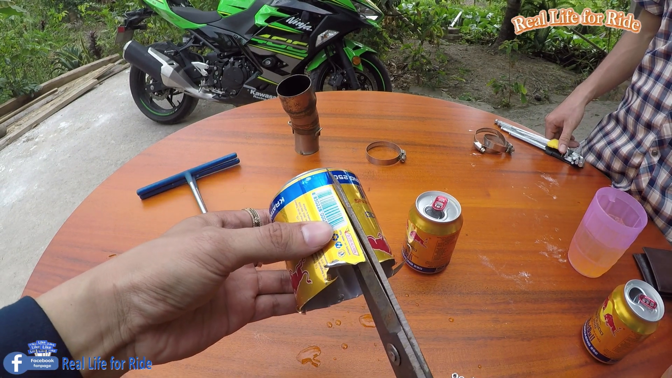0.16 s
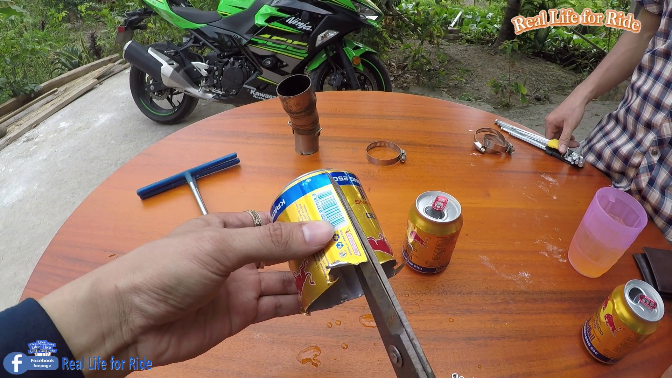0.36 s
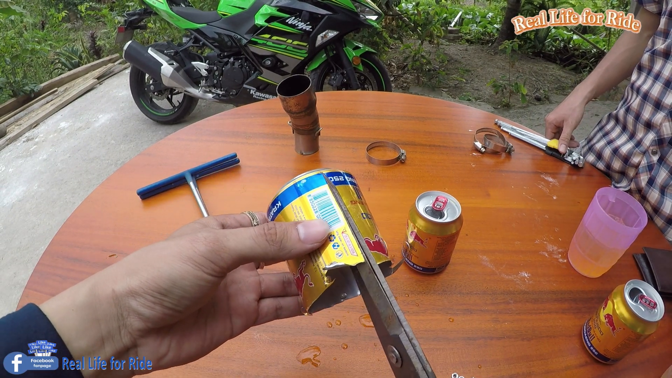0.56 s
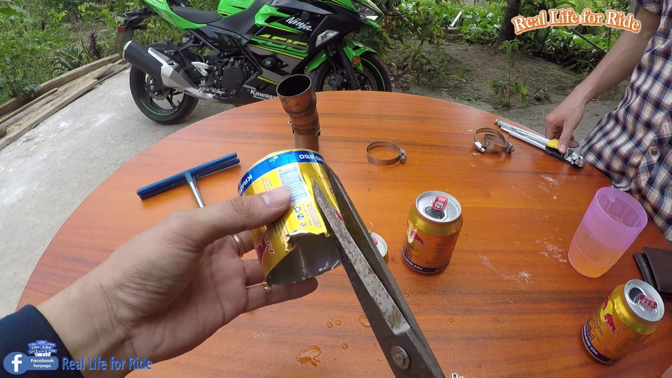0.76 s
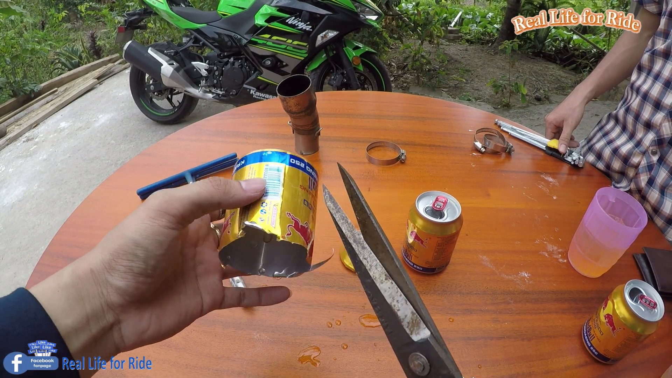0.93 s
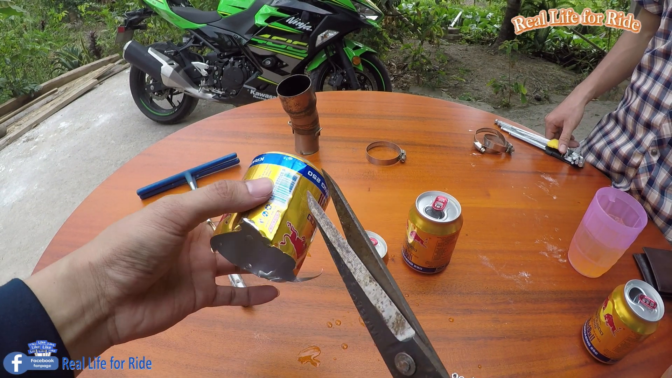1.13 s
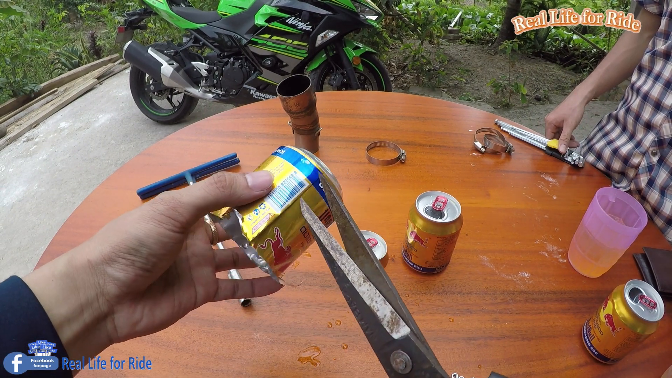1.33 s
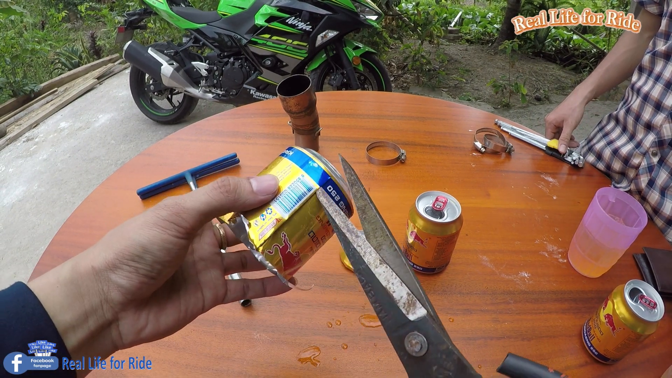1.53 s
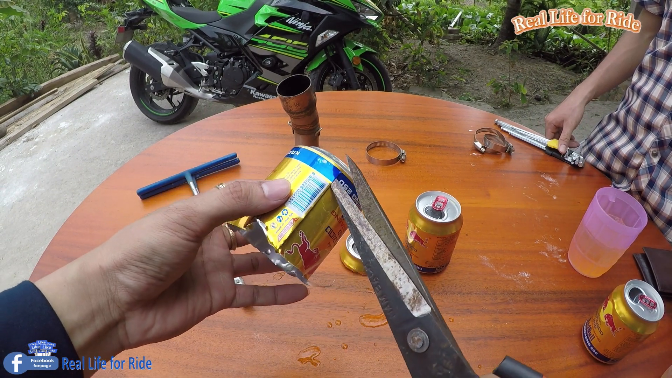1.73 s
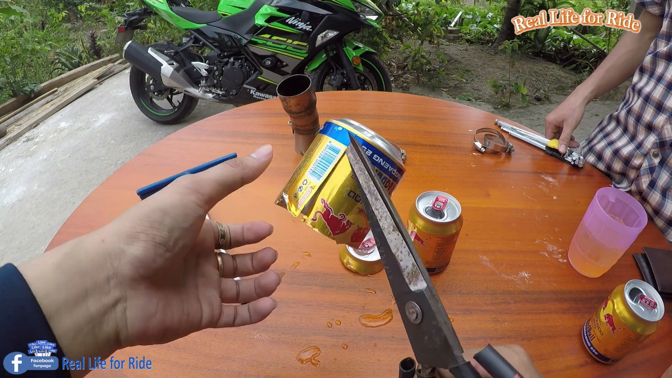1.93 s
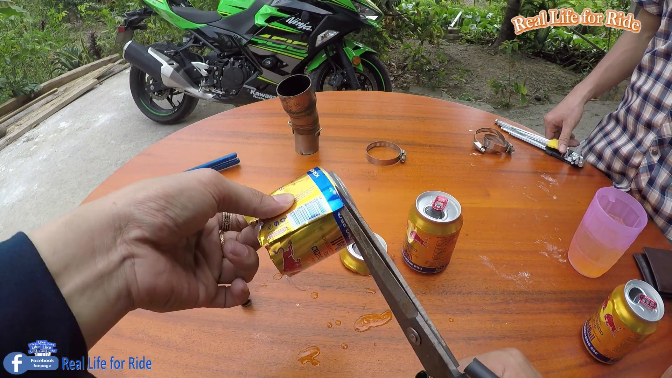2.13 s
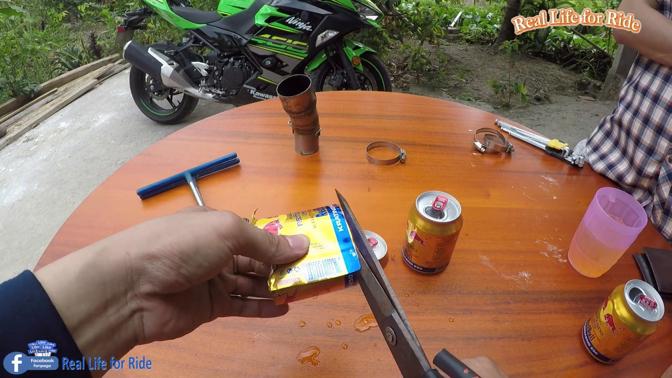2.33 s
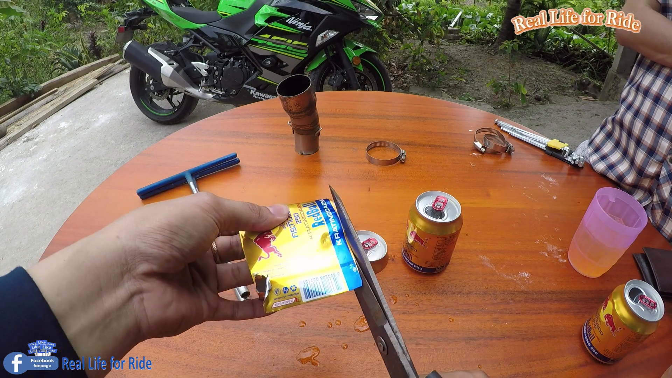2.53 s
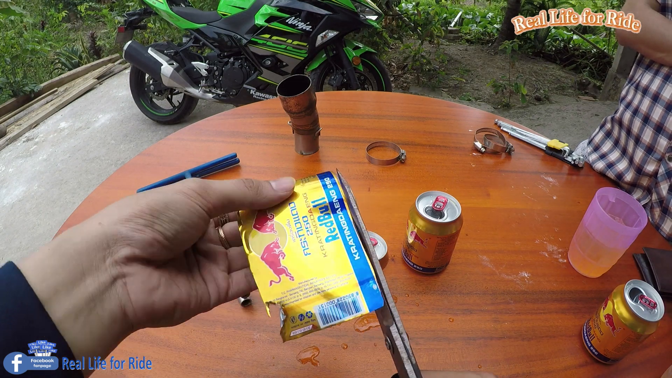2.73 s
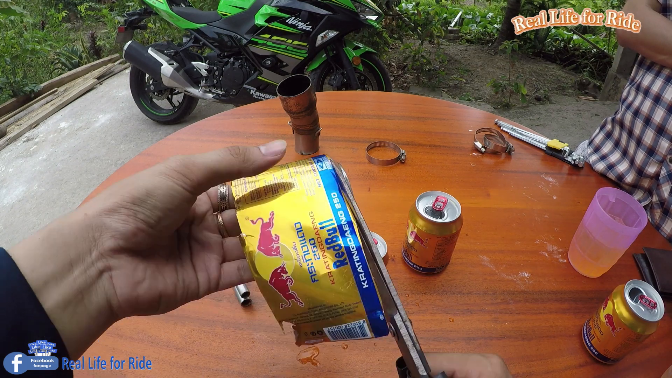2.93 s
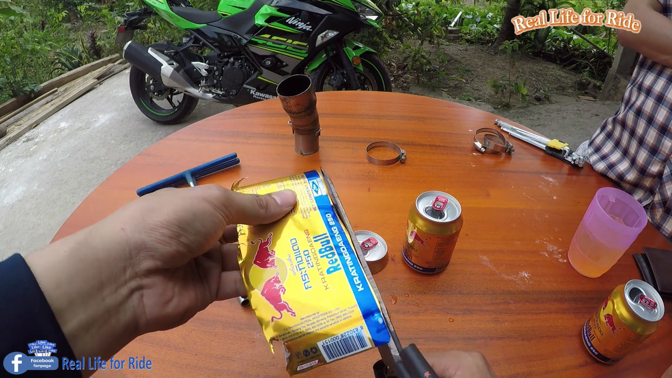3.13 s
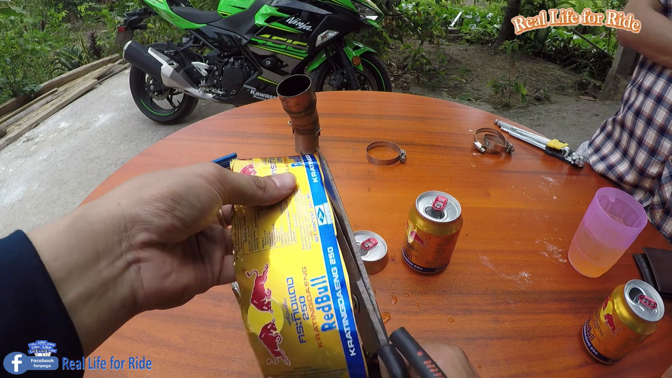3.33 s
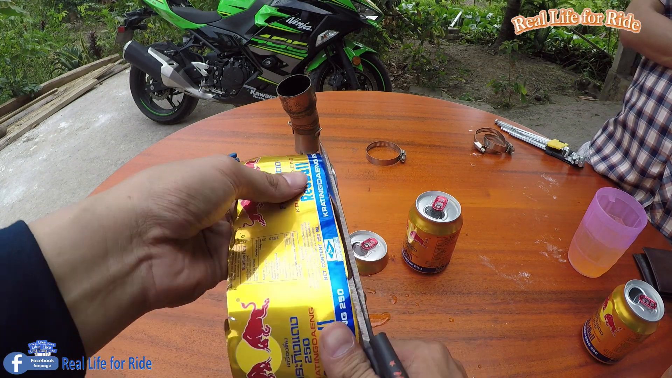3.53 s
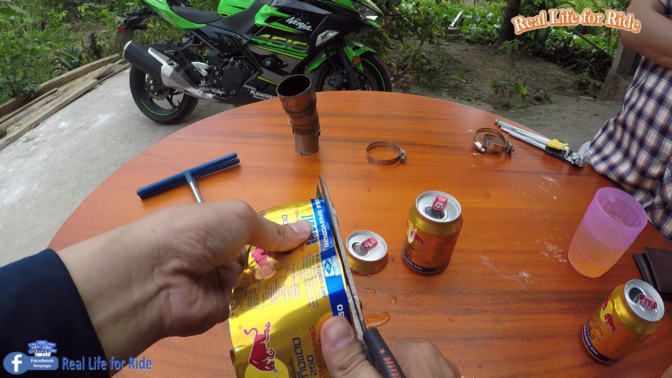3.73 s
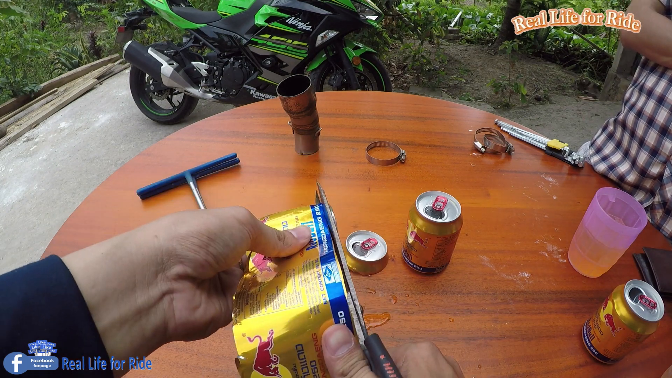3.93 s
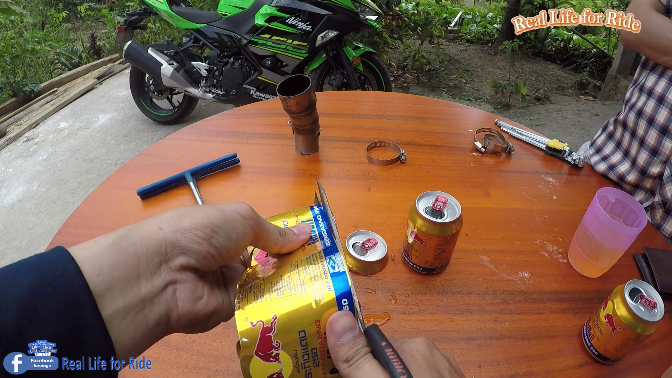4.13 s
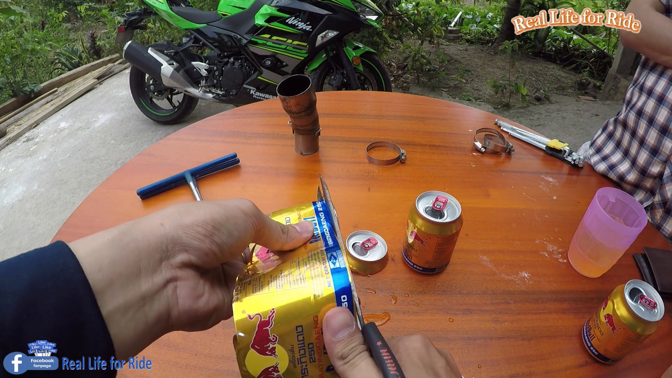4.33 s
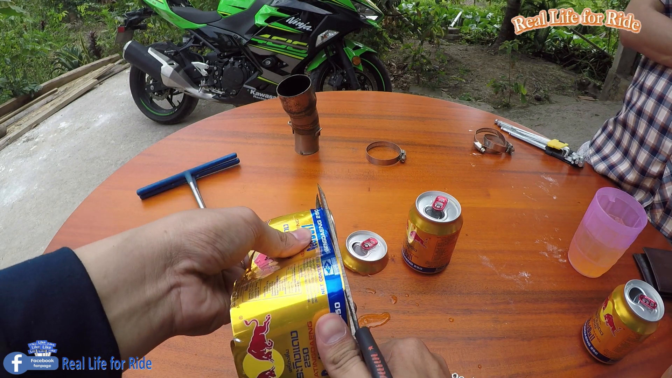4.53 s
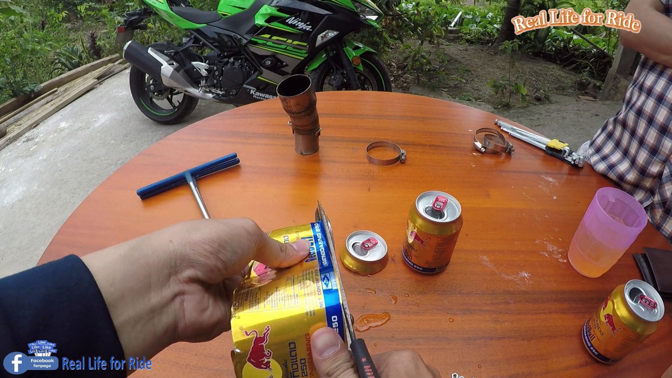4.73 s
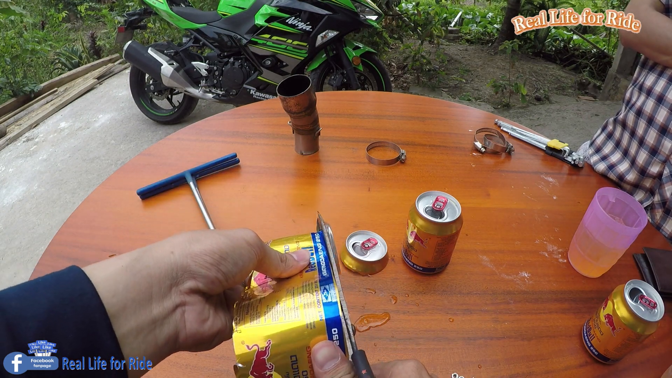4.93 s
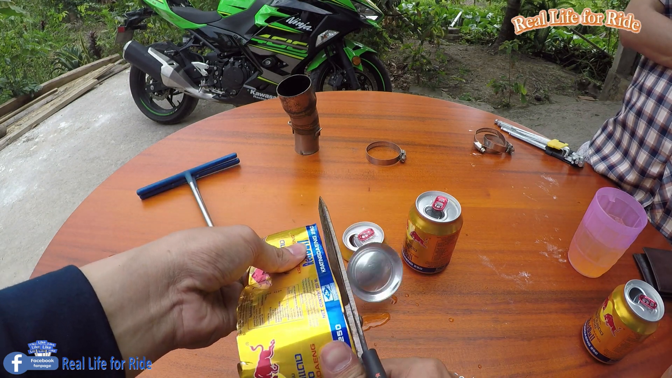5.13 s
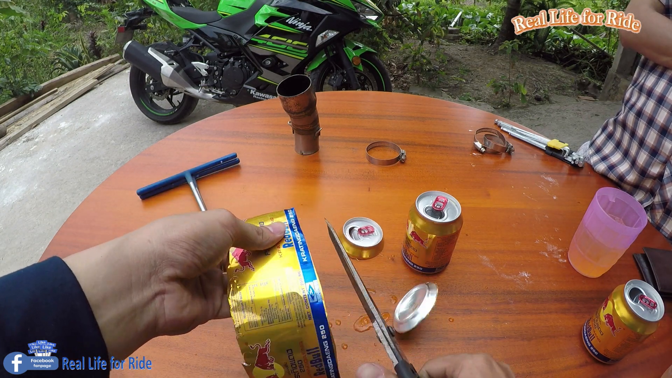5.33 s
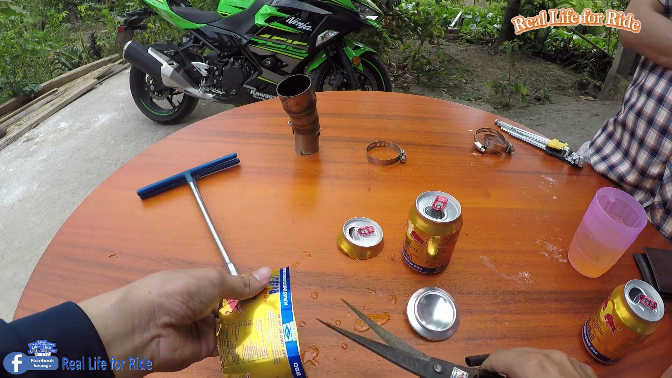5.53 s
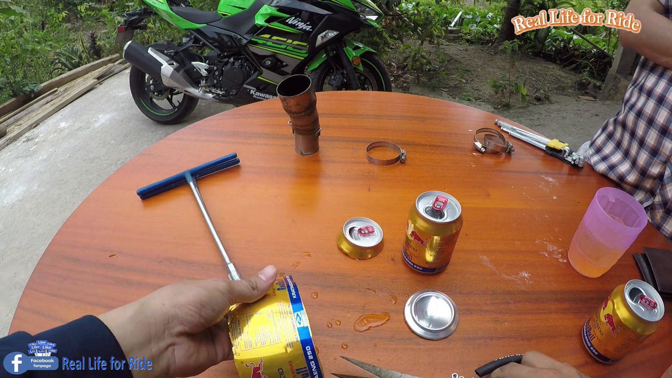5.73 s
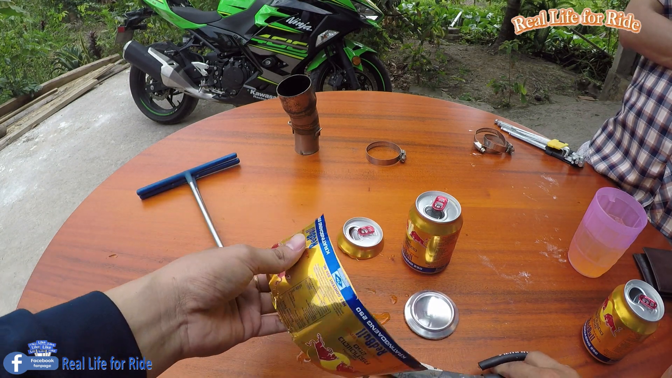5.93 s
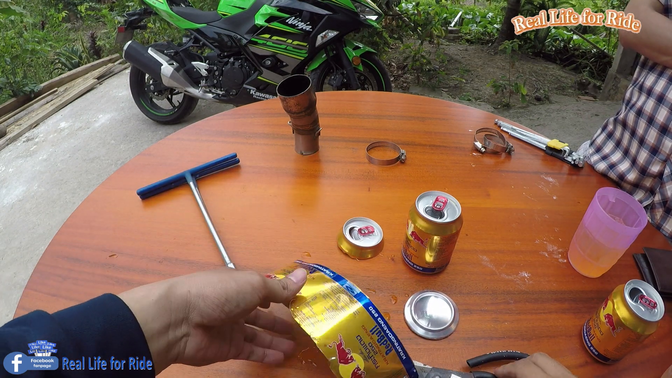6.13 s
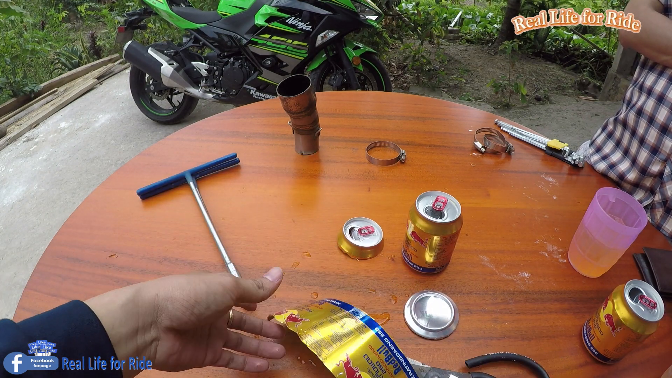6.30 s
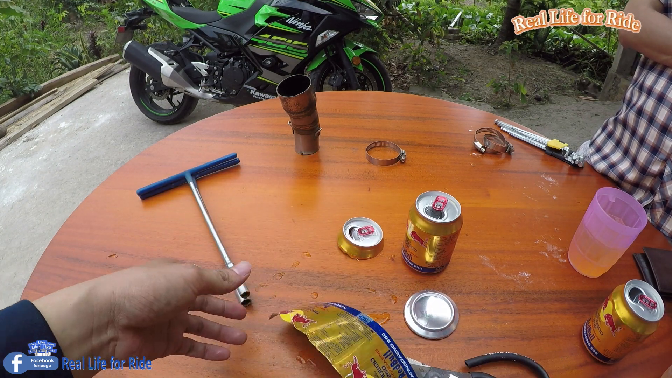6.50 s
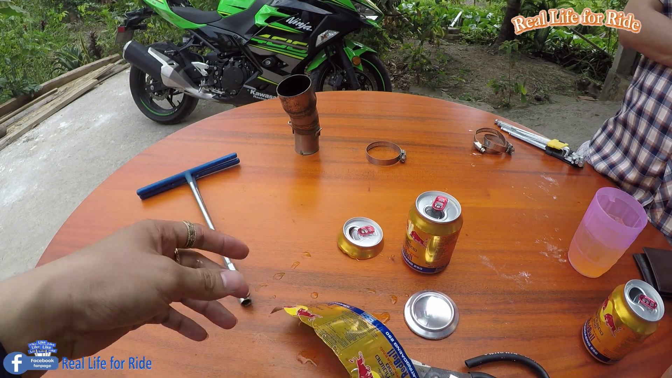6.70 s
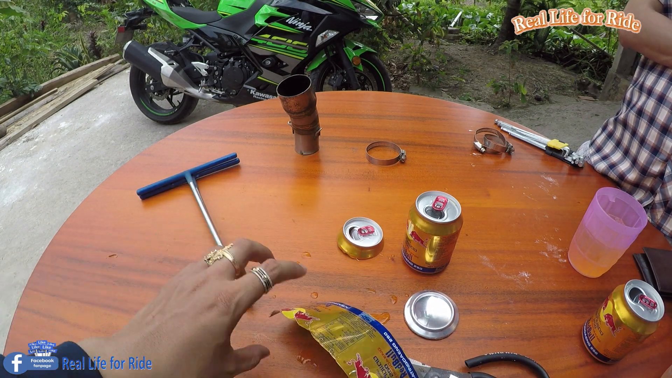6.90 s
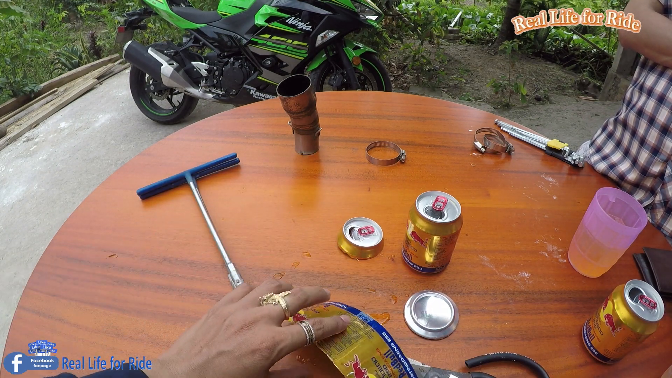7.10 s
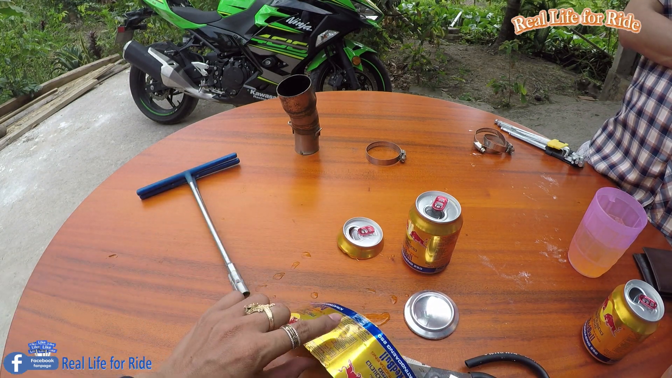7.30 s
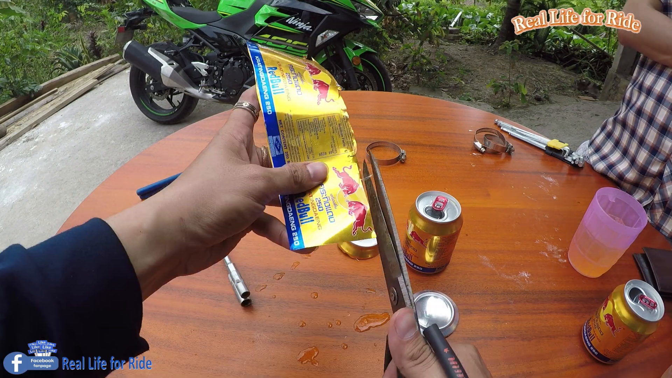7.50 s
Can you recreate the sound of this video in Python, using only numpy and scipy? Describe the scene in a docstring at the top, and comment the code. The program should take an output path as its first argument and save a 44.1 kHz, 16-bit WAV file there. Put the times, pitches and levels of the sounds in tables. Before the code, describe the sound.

Sharp metallic snips in a hollow can, a stretch of tiny high fast-forward ticks, loud sheet snaps, a rattling metal disc, wooden thumps.

```python
"""At a wooden garden table, close to the microphones, big scissors cut up an aluminium can.
Snips and strokes are fracture noise that excites the can's hollow and the modes of its wall.
For a while all runs thin and high, as in fast-forward: tiny ticks, crackle, zips and a thin hiss.
The can's base, cut free, clatters as struck modes on the table, and the scissors are put down;
the loose sheet scrapes in stick-slip and is cut again, over a drone, faint air and a breeze."""
import sys
import numpy as np
from scipy import signal
from scipy.fft import rfft, irfft
from scipy.io import wavfile
from scipy.ndimage import uniform_filter1d, map_coordinates

SR = 44100
rng = np.random.default_rng(int(sys.argv[2]) if len(sys.argv) > 2 else 0)


def wav_record(signal):
    """Record a signal, one row per channel, as 16-bit PCM in the file named by sys.argv[1]."""
    frames = np.transpose(np.atleast_2d(signal))
    bounded = np.clip(frames, -1, 1)
    # unit amplitude maps onto the largest positive 16-bit level
    quanta = np.round(bounded * 32767).astype(np.int16)
    wavfile.write(sys.argv[1], SR, quanta)


N = 333396
TIME = np.arange(N) / SR  # the whole scene (s)
TAIL = np.arange(SR) / SR  # one second of decay (s)


def amp(db):
    """Level law: decibels to amplitude gain."""
    return 10 ** (np.asarray(db) / 20)


def unit(x):
    """Power normalisation: x at rms 1."""
    return x / np.sqrt(np.mean(x ** 2) + 1e-20)


def along(points, hz):
    """Logarithmic frequency scale: (Hz, value) points interpolated on it."""
    point_hz, values = np.transpose(points)
    return np.interp(np.log(hz + 1), np.log(point_hz), values)


def gains(rows):
    """Amplitude envelope: a gain per sample for each dB column, silent outside the rows."""
    times, *columns = np.transpose(rows)
    inside = (TIME >= times[0]) * (TIME <= times[-1])
    return np.array([amp(np.interp(TIME, times, column)) * inside for column in columns])


def add(track, at, sound):
    """Superposition: mix a sound into the track at a time in seconds."""
    part = track[..., max(round(at * SR), 0):][..., :sound.shape[-1]]
    part += sound[..., :part.shape[-1]]


def through(x, response):
    """Linear response: convolve both channels with an impulse response."""
    return signal.fftconvolve(x, np.atleast_2d(response), axes=1)[:, :N]


def colour(x, spectrum, ripple_db=0, size=4096):
    """Minimum-phase filtering that keeps white noise's power; ripple stands for crowded modes."""
    hz = np.fft.rfftfreq(size, 1 / SR)
    skirt = hz ** 2 / (hz ** 2 + (spectrum[0][0] / 2) ** 2)  # rolls off below the first point
    ripple = ripple_db * map_coordinates(rng.standard_normal(size), [hz / 190])
    cepstrum = irfft(np.log(amp(along(spectrum, hz) + ripple) * skirt + 1e-6))
    # folding the cepstrum makes the response causal
    response = irfft(np.exp(rfft(2 * cepstrum[:size // 2], size)))
    return through(x, response / np.linalg.norm(response))


def hiss(alike, size=N):
    """Interchannel coherence: white stereo noise; likeness is a number or (Hz, likeness) points."""
    likeness = along(alike, np.fft.rfftfreq(size, 1 / SR)) if np.ndim(alike) else alike
    turn = np.arccos(np.clip(likeness, -1, 1)) / 2
    a, b = rfft(rng.standard_normal((2, size)))
    mid = irfft(a * np.cos(turn), size)
    side = irfft(b * np.sin(turn), size)
    return np.array([mid + side, mid - side])


# Stereo coherence of the metal. Each row: frequency in Hz, left-right likeness from -1 to 1.
METAL_ALIKE = [(400, .1), (1000, 0.78), (3500, 0.98), (10000, 0.57)]


def bursts(times, levels_db, spectrum, t60, lead_db=-24, alike=METAL_ALIKE, ripple_db=2.0,
           detune=.015, size=4096):
    """Sudden fracture: a short creak leads in, and each crack excites its own mix of modes."""
    out = np.zeros((2, N))
    lead, swell_rate = .01, 3500  # s, dB per s
    t = TAIL[:size] - lead
    shape = amp(np.where(t < 0, lead_db + swell_rate * t, -60 * t / t60))
    for at, db in zip(times, levels_db):
        pitch = np.exp(detune * rng.standard_normal())
        shifted = np.multiply(spectrum, [pitch, 1])
        crack = colour(hiss(alike, size) * shape, shifted, ripple_db)
        add(out, at - lead, amp(db) * crack * np.linalg.norm(shape) / np.linalg.norm(crack))
    return out


def grains(rate, spread_db, t60):
    """Stick-slip friction: an envelope (rms 1) of tiny tears at random, about rate per second."""
    sizes = amp(spread_db * np.minimum(rng.exponential(size=N), 3))
    tears = sizes * (rng.random(N) < rate / SR)
    energy = signal.lfilter([1], [1, -amp(-60 / (t60 * SR)) ** 2], tears ** 2)
    return unit(np.sqrt(energy))


def ring(modes, apart):
    """Modal decay: damped sines, each with a random phase gap between channels (apart, in rad)."""
    hz, db, t60 = np.transpose(modes)[:, :, None]
    strength, shift = rng.standard_normal((2, len(modes), 1))
    rise = 1 - np.exp(-TAIL / .0004)
    fade = rise * amp(db + strength - 60 * TAIL / t60)
    phase = 2 * np.pi * hz * TAIL
    return np.array([(fade * np.sin(phase + side * apart * shift)).sum(0) for side in (-.5, .5)])


def swell(middle, width, order=2):
    """Gaussian envelope: rises and falls around the middle (s); a higher order flattens its top."""
    return np.exp(-.5 * ((TIME - middle) / width) ** order)


def held(start, attack_s, end, release_s):
    """Piecewise-linear envelope: rises from 0 at start, holds 1 until end, then falls back to 0."""
    return np.clip(np.minimum((TIME - start) / attack_s, 1 - (TIME - end) / release_s), 0, 1)


def scatter(start, end, db, count):
    """Random point process: rows (s, dB) of loosely spaced events, their levels varying around db."""
    times = start + (end - start) * (np.arange(count) + 2 * rng.random(count)) / (count + 1)
    return list(zip(times, db + 3 * rng.standard_normal(count)))


# Snips in the closed can. Each row: time in seconds, relative level in dB.
CLOSED_SNIPS = [(0.032, -17.5), (0.105, -18), (0.161, -10.5), (0.182, -15.5), (0.387, -1.5), (0.724, -10),
                (1.189, -23), (1.307, -17.5), (1.559, -13), (1.655, -15.5), (1.832, -13)]
# Blade strokes through the wall. Each row: middle in seconds, relative level in dB,
# half width in seconds, hollow band relative to the edge in dB.
WALL_STROKES = [(0.658, -40, 0.045, 4), (0.727, -25.5, 0.016, -3.5), (0.78, -16.5, 0.027, -16),
                (1.369, -41.5, 0.039, 1), (1.431, -31.5, 0.017, 3.5), (1.47, -37.5, 0.031, 0),
                (1.565, -34.5, 0.019, 3)]
# Modes of the can's wall. Each row: frequency in Hz, relative level in dB, t60 in seconds.
WALL_MODES = [(895, 1, 0.23), (1058, 1.5, 0.33), (3405, -7.5, 0.087), (4670, -10, 0.21), (5700, -12, 0.33),
              (6950, -9.5, 0.25)]
# Modes of the loosened body. Each row: frequency in Hz, relative level in dB.
BODY_MODES = [(404, -1), (603, -2.5), (1040, 1), (1370, -3.5)]
# Spectrum of the cut edge. Each row: frequency in Hz, relative density in dB per Hz.
CAN_EDGE_COLOUR = [(1200, -21), (2000, -7.5), (2900, -10.5), (3400, 3.5), (3900, -4), (5900, 2.5),
                   (8000, -15), (16000, -35.5)]
# Spectrum of the hollow, also for the opened sheet. Each row: frequency in Hz, density in dB per Hz.
HOLLOW_COLOUR = [(350, -13), (720, -3), (1020, 4.5), (1900, -13.5), (3000, -48)]
HOLLOW_DB, HOLLOW_GROWS = -7, 0.83  # answer to a 0 dB snip (dB) and its growth (dB per dB)
CREAK_FROM, CREAK_TO, CREAK_DB = 0.16, 0.4, -37  # wall ticks under pressure (s, s, relative dB)
GROAN_FROM, GROAN_DB, GROAN_T60 = 1.4, -2, 0.068  # body groan (s, dB relative to the hollow, s)
WALL_FREED = 0.805  # the long stroke runs out of the wall (s)


def closed_can():
    """Fracture and resonance: blades snip and tear; the can's hollow and wall answer."""
    times, db = np.transpose(list(CLOSED_SNIPS) + scatter(CREAK_FROM, CREAK_TO, CREAK_DB, count=4))
    cut = bursts(times, db - 5.5, CAN_EDGE_COLOUR, t60=0.027, lead_db=-11.5)
    hollow_db = HOLLOW_DB + HOLLOW_GROWS * db
    cut += bursts(times, hollow_db, HOLLOW_COLOUR, t60=0.036, lead_db=-11.5)
    tear = grains(rate=1600, spread_db=3.5, t60=.01)
    edge = sum(amp(db) * swell(at, width, order=4) for at, db, width, _ in WALL_STROKES)
    hollow = sum(amp(db + rel) * swell(at, width) for at, db, width, rel in WALL_STROKES)
    for force, spectrum in (edge, CAN_EDGE_COLOUR), (hollow, HOLLOW_COLOUR):
        cut += colour(hiss(METAL_ALIKE) * tear * force, spectrum, ripple_db=3)
    out = cut + amp(-64.0) * through(cut, ring(WALL_MODES, apart=1.3))
    # cut far enough, the loosened body groans under the late strokes
    body = ring([(hz, level, GROAN_T60) for hz, level in BODY_MODES], apart=1)
    late_tear = hiss(0.77) * tear * hollow * (TIME > GROAN_FROM)
    out += amp(GROAN_DB) * through(late_tear, body / np.linalg.norm(body[0]))
    # released by the blades, the wall springs back and rings freely
    add(out, WALL_FREED, amp(-30.0) * ring(WALL_MODES, apart=0.94))
    return out


# Snaps in the sheet. Each row: time in seconds, relative level in dB, relative hollow band in dB.
SNAPS = [(4.0416, -17, -4), (4.5701, -22, -21), (4.6432, -4.5, -27.5), (4.7189, -21, -26.5),
         (4.998, 0, -24), (5.3764, -7.5, -20), (7.1736, -12.5, -17), (7.2192, -28, -9), (7.471, -19, -19.5),
         (7.5002, -9, -30)]
# Slides of thin metal. Each row: start in seconds, relative level in dB.
SLIDES = [(4.026, -39.5), (4.22, -48), (4.495, -42), (5.18, -25), (6.03, -27), (6.135, -27.5),
          (6.238, -21.5), (6.37, -35.5), (6.708, -47.5), (7.157, -28.5), (7.23, -38.5), (7.468, -29)]
# Spectrum of the sheet's edge. Each row: frequency in Hz, relative density in dB per Hz.
SHEET_COLOUR = [(710, -38.5), (1400, 2), (6200, 0.5), (7800, -12), (14200, -28), (16000, -43.5)]
# The sheet's clearest modes. Each entry: frequency in Hz.
SHEET_MODES_HZ = [1610, 3020, 4240, 5960]
SHEET_TONES_DB, SHEET_TONES_T60 = -24, 0.12  # relative to the snap's row (dB), decay (s)
SHEET_RING_DB = -25  # rough after-ring, relative to the snap's row (dB)
SLIDE_RISE_S, SLIDE_T60 = 0.0078, 0.31  # every slide swells and dies away alike (s)


def opened_sheet():
    """Plate modes and friction: the unrolled wall snaps, rings on roughly and scrapes as it slides."""
    times, db, hollow_db = np.transpose(SNAPS)
    out = bursts(times, db - 4.0, SHEET_COLOUR, t60=0.03)
    out += bursts(times, db + hollow_db + 4.5, HOLLOW_COLOUR, t60=0.058)
    out += bursts(times, db + SHEET_RING_DB, SHEET_COLOUR, t60=0.18, ripple_db=3, size=8192)
    modes = [(hz, 0, SHEET_TONES_T60) for hz in SHEET_MODES_HZ]
    for at, level, _ in SNAPS:
        add(out, at, amp(level + SHEET_TONES_DB) * ring(modes, apart=1))
    crinkle = grains(rate=1400, spread_db=3.6, t60=0.0066)
    crinkle_seconds = crinkle[:N // SR * SR].reshape(-1, SR)
    swelling = 1 - np.exp(-TAIL / SLIDE_RISE_S)
    for at, level in SLIDES:
        envelope = swelling * amp(level - 60 * TAIL / SLIDE_T60)
        scrape = hiss(METAL_ALIKE, SR) * rng.choice(crinkle_seconds) * envelope
        # every slide bends the sheet anew, and so has its own resonances
        bright = colour(scrape, SHEET_COLOUR, ripple_db=2)
        add(out, at, bright + amp(-12.5) * colour(scrape, HOLLOW_COLOUR))
    return out


# Modes of the blades. Each row: frequency in Hz, relative level in dB, t60 in seconds.
STEEL_MODES = [(3380, -10, 0.083), (5490, 4, 0.059)]
SCRAPE_FROM, SCRAPE_TO, SCRAPE_DB = 1.769, 1.835, -32  # scrape along the edge (s, s, relative dB)
SCRAPE_FROM_HZ, SCRAPE_TO_HZ = 2600, 5100  # pitch climbs towards this as the free edge shortens
BLADES_SHUT = 1.886  # s


def blades():
    """Stick-slip and impact: gritty slips grow louder and brighter; then the blades meet and ping."""
    out = np.zeros((2, N))
    for done in np.linspace(0, 1, num=7, endpoint=False):
        at = SCRAPE_FROM + done * (SCRAPE_TO - SCRAPE_FROM)
        hz = SCRAPE_FROM_HZ + done * (SCRAPE_TO_HZ - SCRAPE_FROM_HZ)
        decay = amp(SCRAPE_DB - 60 * TAIL[:4096] / 0.062)
        slip = (.5 + done) * hiss(0.53, size=4096) * decay
        add(out, at, colour(slip, [(900, -7), (hz, 0), (6500, -6), (9000, -25)], ripple_db=5))
    add(out, BLADES_SHUT, amp(-17.0) * ring(STEEL_MODES, apart=0.6))
    return out


# The rim hits the table. Each row: time in seconds, relative level in dB.
RIM_CONTACTS = [(5.0755, -7.5), (5.103, -1.5), (5.1871, -6), (5.2173, -11), (5.245, -8), (5.4374, -4.5),
                (5.4489, -1.5), (5.457, -13), (5.572, -5), (5.585, -3), (5.595, -9), (5.615, -12),
                (5.661, -14), (5.679, -4.5), (5.694, -7.5), (5.708, -8.5), (5.725, -7), (5.7945, -11),
                (5.888, -21)]
# Modes of the base. Each row: frequency in Hz, relative level in dB, t60 in seconds.
DOME_MODES = [(3080, -5, 0.24), (3640, -3, 0.15), (4390, -7.5, 0.45), (6260, 1, 0.28)]
# Modes of the base lying flat. Each row: frequency in Hz, relative level in dB, t60 in seconds.
FLAT_MODES = [(4455, -0.5, 0.57), (5900, -2, 0.37)]
# Spectrum of the rim's clicks. Each row: frequency in Hz, relative density in dB per Hz.
RIM_COLOUR = [(1200, -21.5), (2800, -4.5), (3700, 1), (6400, -13), (7500, -19), (15500, -39.5)]
# Stereo coherence of those clicks. Each row: frequency in Hz, left-right likeness from -1 to 1.
CLICK_ALIKE = [(1500, 0.33), (3500, 1), (8000, -0.32)]
# Spectrum driving the crowded modes. Each row: frequency in Hz, relative density in dB per Hz.
SHIMMER_COLOUR = [(1400, 1.5), (5500, 6.5), (7500, 1), (15000, -11)]
SHIMMER_DB, SHIMMER_T60 = -3.5, 0.18  # crowded modes (dB relative to each contact's row, s)
CHATTER_FROM, CHATTER_TO, CHATTER_DB = 5.11, 5.78, -18.5  # light chatter (s, s, relative dB)
BASE_SETTLES = 5.794  # the base drops flat (s)


def base():
    """Repeated impact: the stiff round base chatters flat; each rim contact clicks and rings."""
    chatter = scatter(CHATTER_FROM, CHATTER_TO, CHATTER_DB, count=42)
    times, db = np.transpose(list(RIM_CONTACTS) + chatter)
    dome = np.zeros((2, N))
    for at, level in RIM_CONTACTS:
        add(dome, at, amp(level - 25.5) * ring(DOME_MODES, apart=1.2))
    # once it lies flat, hardly anything damps the dome
    add(dome, BASE_SETTLES, amp(-32.5) * ring(FLAT_MODES, apart=0.64))
    # the ragged rim adds a crowd of inharmonic modes, and each contact excites its own mix of them
    crowd_hz = rng.uniform(SHIMMER_COLOUR[0][0], SHIMMER_COLOUR[-1][0], size=76)
    crowd = ring([(hz, 0, SHIMMER_T60) for hz in crowd_hz], apart=1.6)
    strikes = bursts(times, db + SHIMMER_DB, SHIMMER_COLOUR, t60=0.0022, ripple_db=3)
    dome += through(strikes, crowd / np.linalg.norm(crowd[0]))
    return dome + bursts(times, db + .5, RIM_COLOUR, t60=0.008, alike=CLICK_ALIKE, detune=.07)


# Knocks on the table top. Each row: time in seconds, relative level in dB.
TABLE_KNOCKS = [(4.312, -38.5), (5.077, -10.5), (5.124, -15.5), (5.23, -16.5), (5.28, -17.5), (5.506, -20),
                (5.999, -5.5), (6.075, -8), (6.168, -6), (6.217, -13.5), (6.244, -13.5)]
# Things drag on the table. Each row: middle in seconds, relative level in dB, half width in seconds.
TABLE_RUBS = [(1.58, -26, 0.11), (5.27, -23.5, 0.08), (5.65, -25, 0.28), (6.17, -23, 0.09)]
# Modes of the top. Each row: unloaded frequency in Hz, relative level in dB, t60 in seconds.
TOP_MODES = [(111, -14.5, 0.26), (161.8, -2.5, 0.53), (187.6, -6, 0.34), (316, 0.5, 0.13), (345, -2, 0.084),
             (387.8, -1.5, 0.16), (753.6, -2, 0.074)]
# Spectrum of the dragging. Each row: frequency in Hz, relative density in dB per Hz.
DRAG_COLOUR = [(110, -30), (165, 14), (240, -9), (340, -5), (800, -15), (1700, -12), (3600, -45.5)]
# Spectrum of the wooden clack. Each row: frequency in Hz, relative density in dB per Hz.
CLACK_COLOUR = [(250, -16), (450, 1.5), (850, 2.5), (3000, -41.5)]
HARD_DB, SOFTENS = -14.5, 0.77  # upper modes in a 0 dB knock (dB); heavier is duller (dB per dB)
CLACK_DB, CLACK_GROWS = -11.5, 0.41  # relative clack of a 0 dB knock (dB), growth (dB per dB)


def table():
    """Bending modes: knocks and drags boom in the top and shake the two microphones oppositely."""
    rubbing = sum(amp(db) * swell(at, width) for at, db, width in TABLE_RUBS)
    drag = rubbing * grains(rate=80, spread_db=2.0, t60=0.026)
    top = colour(hiss(0.98) * drag, DRAG_COLOUR, ripple_db=-1.5)
    for at, db in TABLE_KNOCKS:
        # harder contact feeds the modes above the main boom; the load on the top shifts them a little
        hard_db = HARD_DB - SOFTENS * db
        load = np.exp(.03 * rng.standard_normal())
        modes = [(hz * load, level + hard_db * (hz > 250), t60) for hz, level, t60 in TOP_MODES]
        onset = 1 - np.exp(-TAIL / 0.0016)
        add(top, at, amp(db + 5.5) * ring(modes, apart=0.55) * onset)
    # the contact itself is a short wooden clack
    times, db = np.transpose(TABLE_KNOCKS)
    clack_db = CLACK_DB + CLACK_GROWS * db
    top += bursts(times, clack_db, CLACK_COLOUR, t60=0.17, lead_db=-19, alike=1.0)
    return top * [[-.46], [1]]


# Loudest snips, shrunk to ticks. Each row: time in seconds, relative level in dB.
FAST_TICKS = [(2.1899, -24), (2.2191, -17), (2.2355, -21), (2.2465, -17.5), (2.4294, -20.5), (2.4498, -20),
              (2.6371, -23.5), (2.7355, -14), (2.7814, -24), (2.838, -19.5), (2.888, -17), (2.973, -20.5),
              (3.0066, -22.5), (3.0789, -16.5), (3.3488, -20.5), (3.492, -20.5), (3.609, -25),
              (3.6734, -21), (3.688, -20)]
# Whole strokes, sped up. Each row: middle in seconds, relative level in dB.
FAST_ZIPS = [(2.107, -33.5), (2.322, -31), (2.839, -36.5)]
# Runs of crinkling, sped up. Each row: start in seconds, end in seconds, relative level in dB.
FAST_CRUNCHES = [(2.656, 2.972, -28), (3.109, 3.309, -30), (3.357, 3.584, -28)]
# Spectrum of a tick's body. Each row: frequency in Hz, relative density in dB per Hz.
TICK_BODY_COLOUR = [(1100, -50.5), (1600, -2.5), (8000, -11), (13500, -5.5), (16000, -13)]
# Spectrum of the wall's ring, far up in the treble. Each row: frequency in Hz, density in dB per Hz.
ZIP_RING_COLOUR = [(5000, -22.5), (9000, -12), (11500, -0.5), (16000, -12.5)]
# Spectrum of the thin hiss. Each row: frequency in Hz, relative density in dB per Hz.
FAST_AIR_COLOUR = [(1150, -22), (1550, 4.5), (2400, -5), (16000, -23)]


def fast_forward():
    """Time compression: snips become ticks, crinkling crackle, strokes high zips, the yard a hiss."""
    crackle = [tick for run in FAST_CRUNCHES for tick in scatter(*run, count=24)]
    times, db = np.transpose(list(FAST_TICKS) + crackle)
    # every tick has its own share of body and of bright ring
    body_db = db - 6.0 + 3 * rng.standard_normal(len(times))
    out = bursts(times, body_db, TICK_BODY_COLOUR, t60=0.011, lead_db=-16, alike=0.52, ripple_db=3)
    out += bursts(times, db - 3.5, ZIP_RING_COLOUR, t60=0.002, alike=0.29, ripple_db=4, detune=.15)
    strokes = sum(amp(level) * swell(at, width=0.013) for at, level in FAST_ZIPS)
    zipping = strokes * grains(rate=600, spread_db=7.0, t60=0.0065)
    out += colour(hiss(.8) * zipping, ZIP_RING_COLOUR, ripple_db=4)
    return out + amp(-52.5) * colour(hiss(0.43), FAST_AIR_COLOUR)


def walls(x):
    """Reverberation: a weak, short, exponentially decaying answer from the house and paving."""
    tail = rng.standard_normal((2, SR)) * amp(-60 * TAIL / 0.27)
    return amp(-14.5) * through(x, tail / np.linalg.norm(tail[0]))


# Breeze on the microphones. Each row: time in seconds, relative level in dB.
BREEZE_LEVEL = [(5.05, -65), (5.24, -45), (6.24, -43), (6.46, -52.5), (7.55, -44)]
# Spectrum of the breeze. Each row: frequency in Hz, relative density in dB per Hz.
BREEZE_COLOUR = [(45, -0.5), (250, -14), (16000, -81)]
# Spectrum of the drone. Each row: frequency in Hz, relative density in dB per Hz.
DRONE_COLOUR = [(100, -33.5), (160, 4), (380, -11.5), (1000, -50)]
# Spectrum of the air. Each row: frequency in Hz, relative density in dB per Hz.
AIR_COLOUR = [(200, -15.5), (400, -0.5), (1870, -14), (10700, -25), (16000, -63)]
DRONE_DB, AIR_DB = -41.5, -50.5  # background outside the lull (dB)
LULL_FROM, LULL_FALL_S, LULL_TO, LULL_RISE_S = 6.3, 0.12, 7.1, 0.43  # it sinks and returns (s)
DRONE_DIP_DB, AIR_DIP_DB = 31, 10  # depth of that lull (dB)


def yard():
    """Broadband ambient noise: a low drone and faint air sink for a moment; a breeze comes later."""
    lull = held(LULL_FROM, LULL_FALL_S, LULL_TO, LULL_RISE_S)
    drone = amp(DRONE_DB - DRONE_DIP_DB * lull) * colour(hiss(0), DRONE_COLOUR)
    air = amp(AIR_DB - AIR_DIP_DB * lull) * colour(hiss(0.11), AIR_COLOUR)
    breeze = amp(4.5) * gains(BREEZE_LEVEL)[0] * colour(hiss(1.0), BREEZE_COLOUR)
    return drone + air + breeze


FAST_FROM, FAST_TO = 2.0, 3.73  # the fast-forward stretch (s)


def scene():
    """Superposition: metal, table and yard, giving way to the fast-forward stretch."""
    metal = closed_can() + opened_sheet() + blades() + base()
    inside = (TIME > FAST_FROM) & (TIME < FAST_TO)
    fast = uniform_filter1d(1.0 * inside, size=200)  # short crossfades
    normal = metal + walls(metal) + table() + yard()
    return (1 - fast) * normal + fast * fast_forward()


TOP_HZ = 16500  # band limit


def record(dry):
    """Saturation and band limiting: peaks round off near full scale; the top of the band is cut."""
    rounded = dry / (1 + dry ** 6) ** (1 / 6)
    return irfft(rfft(rounded) * (np.fft.rfftfreq(N, 1 / SR) < TOP_HZ), N)


dry = scene()
out = record(dry)
wav_record(out)
```